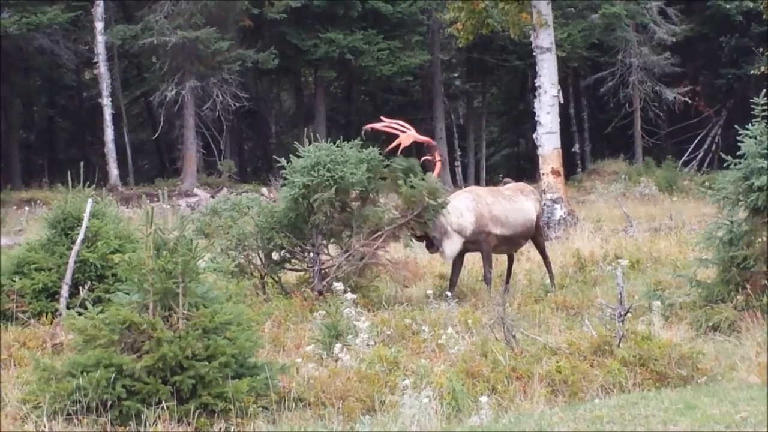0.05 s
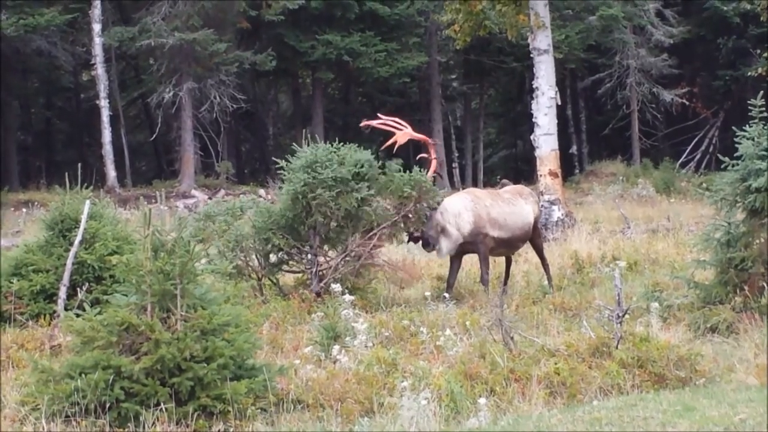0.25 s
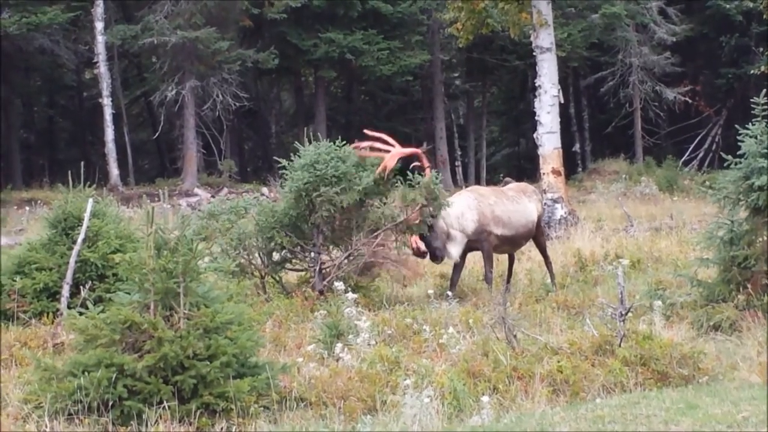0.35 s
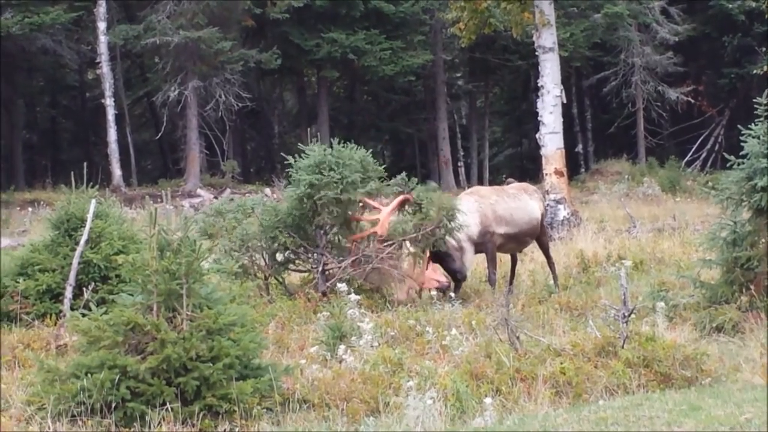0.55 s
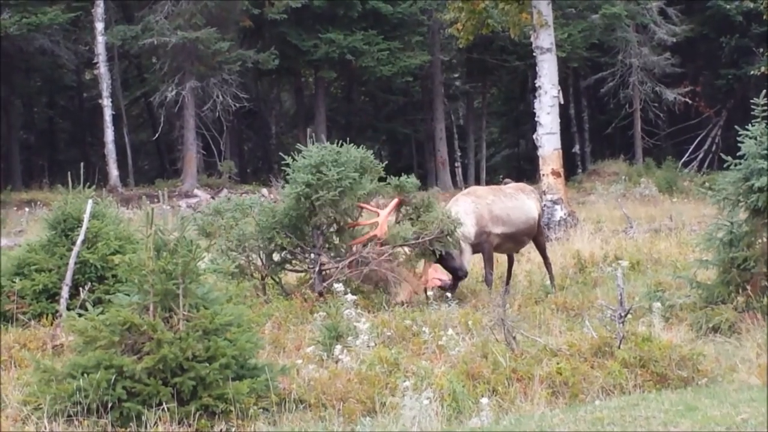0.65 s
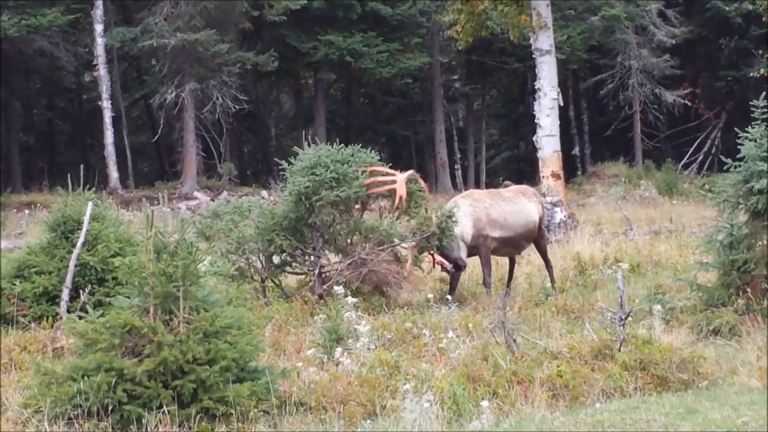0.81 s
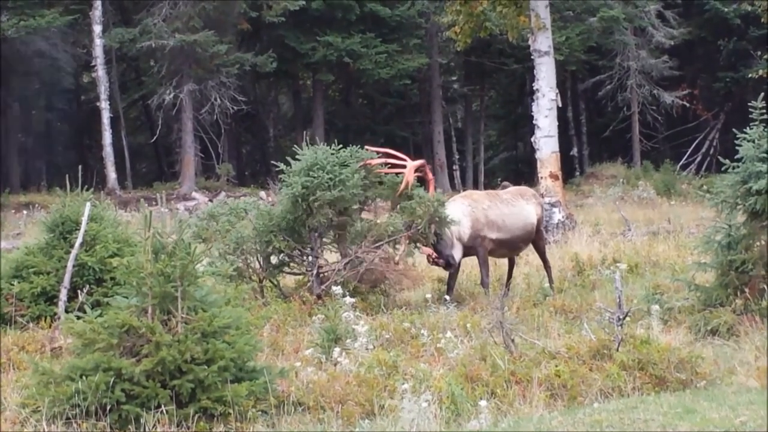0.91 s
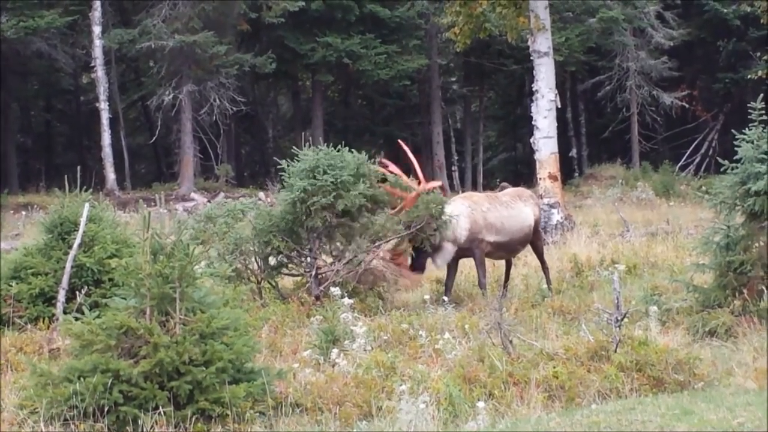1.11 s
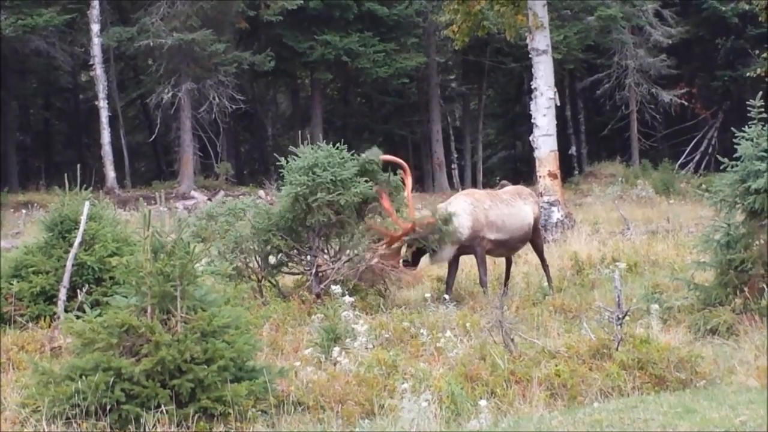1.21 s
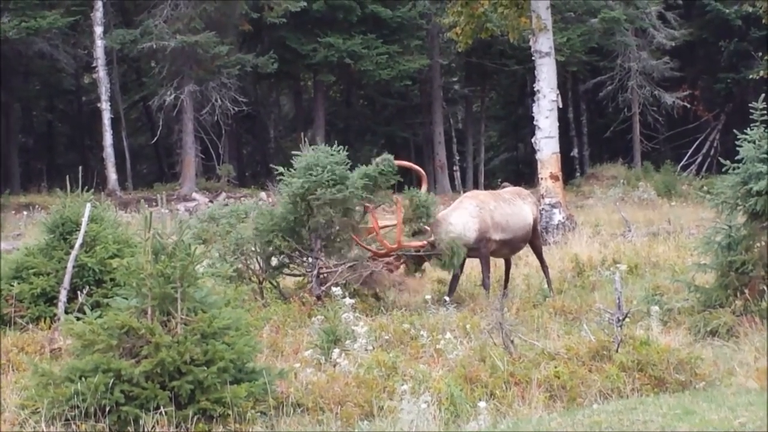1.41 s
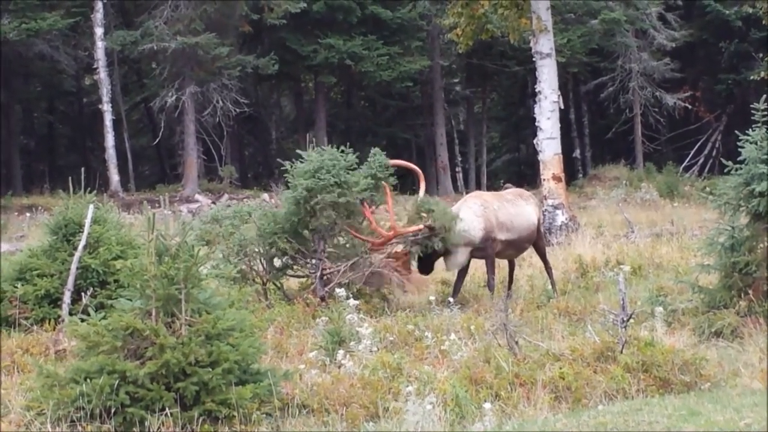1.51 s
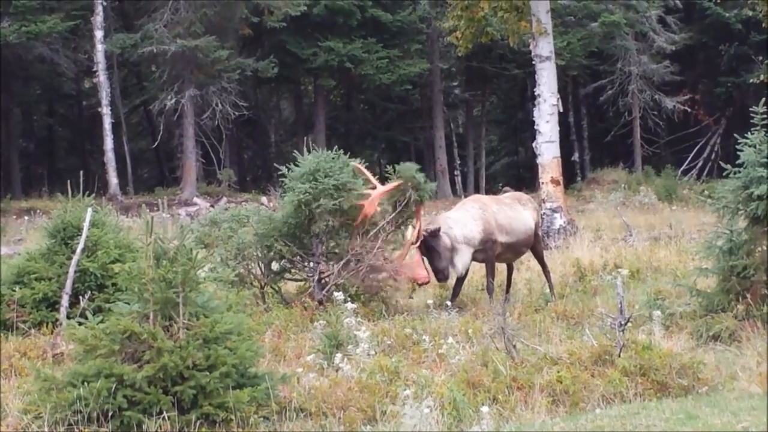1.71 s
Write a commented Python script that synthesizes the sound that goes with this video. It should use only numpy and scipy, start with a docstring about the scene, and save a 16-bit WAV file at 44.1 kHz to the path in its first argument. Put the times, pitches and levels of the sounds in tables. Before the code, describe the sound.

Branches swish, crackle and snap as a caribou rakes a tree, with brief bird chirps.

```python
"""Swishing, crackling and woody knocks: a caribou thrashes a small spruce at a forest edge, some way off.
Antler tines strike and scrape the boughs, needles and twigs rustle as dense tiny clicks, and dry twigs
snap. There is one dull thud, then a branch cracks fibre by fibre. A small bird nearby whistles and rasps.
The trees scatter the sounds back over a quiet outdoor floor."""
import sys
import numpy as np
from scipy import signal
from scipy.fft import rfft, irfft
from scipy.io import wavfile
from scipy.ndimage import uniform_filter1d

SR = 44100
rng = np.random.default_rng(int(sys.argv[2]) if len(sys.argv) > 2 else 0)


def file_out(sig):
    """Save sig as 16-bit WAV at sys.argv[1]."""
    # one column per channel
    cols = np.atleast_2d(sig).T
    # limit, then scale
    lim = np.clip(cols, -1, 1)
    pcm = np.round(lim * 32767).astype(np.int16)
    wavfile.write(sys.argv[1], SR, pcm)


N = 77175
LEAD_S = .01  # burst start to peak
SNAP_RISE = .29  # build-up time / decay time

# bough resonance: f/Hz, level/dB
WOOD = [(150, -17), (450, 1.5), (1050, 1), (1400, -3), (1760, 6), (2080, -4), (2450, 6.5), (3150, -6.5),
        (3550, -3), (4500, -5.5), (5800, 5.5), (7500, 6.5), (11000, -21.5)]


def knocks():
    """Tines strike and scrape boughs, each with the ring of wood and peaks of its own."""
    # t/s, level/dB, decay/s, centre f/Hz
    strikes = [(.035, -44.5, 0.0022, 2320), (.077, -43, 0.0046, 1920), (.111, -51, .005, 700),
               (.182, -47, 0.0097, 1720), (.257, -45.5, 0.0033, 1680), (.2615, -40.5, .002, 2040),
               (.281, -53, 0.0034, 1600), (.393, -48, .006, 1530), (.468, -50.5, 0.0027, 2300),
               (.487, -43, 0.0042, 2100), (.538, -51.5, 0.0023, 2400), (.604, -49.5, .003, 1770),
               (.655, -49.5, 0.0055, 960), (.659, -44.5, 0.0028, 2430), (.728, -52, 0.0016, 2530),
               (.861, -49.5, .0026, 2300), (.901, -50.5, 0.0022, 2050), (.917, -52, 0.0068, 2060),
               (1.109, -45.5, 0.0047, 2300), (1.122, -45.5, 0.0037, 1580), (1.178, -44, .0032, 1880),
               (1.192, -46.5, 0.0089, 1800), (1.203, -49, 0.0034, 2820), (1.217, -44.5, 0.0054, 1280),
               (1.223, -42, 0.00074, 1790), (1.244, -41.5, 0.0038, 1680), (1.297, -52.5, 0.0054, 1800),
               (1.311, -49, .005, 1490), (1.3482, -42, .0014, 1680), (1.3531, -36.3, .003, 1800),
               (1.362, -46, 0.0036, 1510), (1.393, -42, 0.0068, 1680), (1.405, -45, 0.0044, 1490),
               (1.445, -49, 0.012, 1320)]
    ripple_hz = np.arange(1, 64) * 263
    out = np.zeros(N)
    for s, db, decay_s, hz in strikes:
        bough_db = read(WOOD, ripple_hz) + 3 * rng.standard_normal(len(ripple_hz))
        bough = np.column_stack([ripple_hz, bough_db])
        add(out, s - LEAD_S, burst(db, decay_s, bough, hz, width_oct=.82, rise=.72))
    return outdoors(out * pan(1.8), near_db=-4, near_s=.0074, far_db=-16.5)


def rustle():
    """Needles swish, twigs crackle and boughs buffet as the tree is shaken."""
    # needle envelope: t/s, level/dB
    swish = [(0, -43), (.035, -58.5), (.085, -51.5), (.15, -52.5), (.19, -48.5), (.3, -50), (.41, -46),
             (.48, -51), (.53, -54), (.585, -49), (.66, -50.5), (.75, -57), (.83, -60.5), (.885, -52),
             (.91, -54.5), (.94, -48.5), (.99, -53), (1.05, -56), (1.07, -45), (1.12, -45.5), (1.16, -52),
             (1.23, -51), (1.28, -53.5), (1.33, -54.5), (1.4, -44.5), (1.45, -51.5), (1.5, -60),
             (1.58, -67), (1.75, -66.5)]
    # shaking envelopes: t/s, twig level/dB, bough level/dB
    shake = [(0, -53, -64), (.05, -59.5, -59), (.18, -51.5, -55.5), (.23, -51.5, -60.5), (.33, -57.5, -58),
             (.42, -52.5, -56.5), (.52, -58, -61), (.6, -54.5, -62), (.7, -58, -61.5), (.76, -60, -63),
             (.81, -62, -62.5), (.88, -59, -64.5), (.98, -60, -67.5), (1.05, -55.5, -62),
             (1.075, -55.5, -58.5), (1.15, -54.5, -57), (1.22, -49.5, -59.5), (1.28, -58, -57.5),
             (1.34, -55.5, -62.5), (1.4, -54, -57), (1.45, -57.5, -59), (1.49, -62, -65),
             (1.58, -67.5, -67.5), (1.75, -67.5, -72.5)]
    # spectra: f/Hz, level/dB
    needle_spectrum = [(1500, -29), (2500, -12), (3300, -13.5), (4500, -11), (5200, 3), (5850, 2),
                       (6600, 1), (8000, -1.5), (10500, -13), (12500, -22), (14500, -36)]
    twig_spectrum = [(200, -9.5), (330, -6), (550, -4.5), (1000, -5), (1750, -1.5), (2080, -3.5), (2500, 3),
                     (3200, -8), (4400, -8.5), (8000, -23)]
    bough_spectrum = [(20, 1.5), (42, -8), (70, 2), (125, 4), (210, 2), (330, -6.5), (600, -25.5),
                      (2000, -19)]
    needles = colour(spread(grains(per_s=9000, size_db=4), .28), needle_spectrum)
    twigs = colour(spread(grains(per_s=2200, size_db=2.5), .44), twig_spectrum)
    boughs = colour(spread(rng.standard_normal((3, N)), .73), bough_spectrum)
    foliage = needles * level(swish) * pan(-5) + twigs * level(shake) * pan(1)
    buffeting = boughs * level(shake, column=2) * pan(.8)
    return outdoors(foliage, near_db=-19.5, near_s=.0066, far_db=-16) + buffeting


def crack():
    """A branch gives way fibre by fibre and rings briefly."""
    # t/s, level/dB, centre f/Hz
    fractures = [(1.0572, -41, 2360), (1.0579, -34.5, 3260), (1.0592, -30, 1950), (1.0629, -39, 2400),
                 (1.0649, -37.5, 1890), (1.072, -46, 1710), (1.0765, -42, 1730), (1.091, -44.5, 1670)]
    # f/Hz, level/dB, t60/s
    branch_modes = [(1566, -47, 0.13), (1764, -41.5, .13), (1905, -44.5, .13), (1990, -41, .04),
                    (2285, -48, 0.1), (2450, -37, 0.082), (3574, -34, .03)]
    decay_s, ring_start_s = .00043, 1.059
    out, t = np.zeros(N), np.arange(SR // 4) / SR
    for s, db, hz in fractures:
        add(out, s - LEAD_S, burst(db, decay_s, WOOD, hz, width_oct=.56, rise=SNAP_RISE))
    add(out, ring_start_s, ring(branch_modes, t))
    return outdoors(out * pan(.66), near_db=-7, near_s=.0031, far_db=-12.5)


def ticks():
    """Thin dry twigs snap brightly."""
    # t/s, level/dB, centre f/Hz, left-right/dB
    snaps = [(0.0115, -42, 8500, -10), (0.0774, -38, 6800, -6), (.602, -34.5, 6100, -6),
             (0.61, -37, 5700, -2), (0.9293, -49.5, 8500, -12), (.9415, -48, 7800, -16),
             (1.0564, -39, 6700, -8), (1.0576, -36, 6300, -4), (1.0594, -38, 6300, -4),
             (1.085, -43, 6000, -3), (1.3485, -48.5, 7200, -14), (1.355, -51, 6200, -8),
             (1.5955, -58.5, 6900, -5), (1.7045, -53.5, 8000, -9)]
    # twig resonance: f/Hz, level/dB
    twig = [(500, -4), (2500, -5), (4300, -23), (5600, 1), (6800, 1.5), (8300, 0.5), (10500, -9),
            (14000, -2)]
    decay_s = .00086
    out = np.zeros((2, N))
    for s, db, hz, side_db in snaps:
        add(out, s - LEAD_S, pan(side_db) * burst(db, decay_s, twig, hz, width_oct=.35, rise=SNAP_RISE))
    return outdoors(out, near_db=-7, near_s=.0048, far_db=-14.5)


def flicks():
    """Dry needles flick past a tine in short sprays of fine clicks."""
    # peak t/s, half length/s, level/dB
    sprays = [(.085, .012, -61), (0.609, 0.0096, -46), (0.93, 0.028, -53.5), (1.08, 0.018, -57)]
    # spray spectrum: f/Hz, level/dB
    fizz = [(4000, -22), (7000, 3), (8500, -3), (11000, -5), (14000, -4)]
    t = np.arange(N) / SR
    swell = sum(amp(db) * np.exp(-((t - s) / half_s) ** 2) for s, half_s, db in sprays)
    return colour(spread(grains(per_s=6000, size_db=4), .35), fizz) * swell * pan(-8)


def thud():
    """One dull blow, as of a hoof or the trunk."""
    # f/Hz, level/dB, t60/s
    thud_modes = [(239, -41.5, 0.084), (292, -36, 0.027), (314, -44, 0.12), (401, -46.5, 0.087),
                  (664, -49, 0.043), (1190, -48.5, 0.032)]
    start_s, attack_s = .772, .0025
    out, t = np.zeros(N), np.arange(SR // 4) / SR
    add(out, start_s, np.minimum(t / attack_s, 1) * ring(thud_modes, t))
    return outdoors(out * pan(1.7), near_db=-11, near_s=.012, far_db=-14.5)


def bird_whistles():
    """Thin arched whistles that waver a little."""
    # t/s, length/s, first f/Hz, middle f/Hz, last f/Hz, level/dB, relative octave level/dB
    notes = [(0.204, 0.058, 4390, 5684, 5640, -25, -29.5), (0.271, 0.02, 5580, 5600, 5250, -37.5, -21),
             (.357, .034, 4700, 5880, 5270, -23, -46), (.436, 0.044, 4430, 5070, 4310, -49.5, -11),
             (1.507, 0.018, 6170, 6030, 5880, -59, -15), (1.639, 0.021, 6100, 5900, 5750, -63, -21)]
    rise_share, fall_share, waver_share, waver_db = .42, .26, .002, .6
    out = np.zeros(N)
    for s, length_s, first_hz, middle_hz, last_hz, db, octave_db in notes:
        u = np.linspace(0, 1, round(length_s * SR))
        hz = arch(u, first_hz, middle_hz, last_hz) * (1 + waver_share * quiver(len(u), smooth=100))
        phase = 2 * np.pi * np.cumsum(hz) / SR
        tone = unit(np.sin(phase) + amp(octave_db) * np.sin(2 * phase))
        ramp = np.minimum(u / rise_share, (1 - u) / fall_share)
        swell = np.sin(np.pi / 2 * np.minimum(ramp, 1)) ** 1.8
        add(out, s, amp(db + waver_db * quiver(len(u), smooth=100)) * swell * tone)
    return outdoors(out * pan(-8), near_db=-31, near_s=.0044, far_db=-19)


def bird_rasps():
    """Buzzy notes: gliding, jittery harmonics and a scratchy hiss pass one throat."""
    # one curve per note: t/s, f/Hz, level/dB, hoarseness/0-1
    notes = [
        [(.304, 1134, -52, .8), (.311, 1190, -36.5, 0.4), (.319, 1292, -35, 0.55), (.327, 1398, -36, 0.43),
         (.333, 1520, -38.5, 0.54), (.339, 1595, -31.5, 0.3), (.344, 1577, -36.5, 0.4), (.351, 1500, -50, 0.9)],
        [(.393, 1121, -49, .9), (.403, 1215, -34.5, 0.6), (.411, 1341, -38.5, 0.64), (.418, 1248, -41.5, 0.73),
         (.428, 1170, -48, 0.8)],
    ]
    # throat resonance: f/Hz, level/dB
    throat = [(1200, -37), (2200, -30), (2650, -10), (3200, -10), (3700, -23), (4250, -8.5), (4900, -16),
              (5700, -4), (6300, 4), (7200, -10), (8000, -9.5), (9400, -18.5), (10400, -23), (11300, -12),
              (12500, -21.5), (13500, -48)]
    jitter_share = .048
    out = np.zeros((2, N))
    hiss = colour(spread(grains(per_s=6000, size_db=3), .3), throat)
    for note in notes:
        s, *curves = np.transpose(note)
        t = np.arange(s[0], s[-1], 1 / SR)
        hz, db, hoarse = (np.interp(t, s, curve) for curve in curves)
        phase = 2 * np.pi * np.cumsum(hz * (1 + jitter_share * hoarse * quiver(len(t), smooth=24))) / SR
        harmonics = sum(amp(read(throat, k * hz)) * np.sin(k * phase + 2 * np.pi * rng.random())
                        for k in range(1, 11))
        breath = hiss[:, round(s[0] * SR):][:, :len(t)]
        add(out, s[0], amp(db) * (np.sqrt(1 - hoarse ** 2) * unit(harmonics) + hoarse * breath))
    return outdoors(out * pan(-4), near_db=-7, near_s=.00084, far_db=-13.5)


def outdoors(x, near_db, near_s, far_db):
    """Adds quick scatter from nearby foliage and a faint forest tail."""
    # forest decay: f/Hz, t60/s
    forest = [(100, 0.56), (1000, .4), (3000, 0.39), (6000, 0.61), (14000, 0.22)]
    t = np.arange(SR // 2) / SR
    near, far = rng.standard_normal((2, 2, len(t)))
    hz, frame_s, bands = signal.stft(far, SR, nperseg=256)
    decay = amp(-60 * frame_s / read(forest, hz)[:, None])
    far = signal.istft(bands * decay, SR, nperseg=256)[1][:, :len(t)]
    scatter = amp(near_db) * unit(near * np.exp(-t / near_s))
    tail = amp(far_db) * unit(far * np.minimum(t / .025, 1))
    x = x * np.ones((2, 1))
    return x + signal.fftconvolve(x, (scatter + tail) / np.sqrt(len(t)), axes=1)[:, :N]


def air():
    """Quiet outdoor floor, mostly low rumble."""
    # f/Hz, level/dB
    air_spectrum = [(15, -28), (42, 17), (70, 12), (135, -14), (260, -27), (1000, -12), (1500, -41),
                    (2500, -32), (3700, -12), (5900, -36), (9500, -12), (14000, -12)]
    return amp(-70) * colour(spread(rng.standard_normal((3, N)), .21), air_spectrum) * pan(-1.7)


def burst(db, decay_s, body, centre_hz, width_oct, rise, size=6144):
    """Slips swell until LEAD_S and die, ringing a body; db is the level of their energy over 5 ms."""
    hz, t = abs(np.fft.fftfreq(size, 1 / SR)), np.arange(size) / SR - LEAD_S
    skirt_db = -25.5
    hump = np.exp(-.5 * (np.log2((hz + 1) / centre_hz) / width_oct) ** 2) + amp(skirt_db)
    log_gain = np.log(hump * amp(read(body, hz)))
    response = np.fft.ifft(np.exp(np.conj(signal.hilbert(log_gain)))).real  # minimum phase
    envelope = np.exp(-np.maximum(t, -t / rise) / decay_s)
    slips = rng.standard_normal(size) * rng.exponential(1, size) * envelope
    sound = signal.fftconvolve(slips, response)[:size]
    return amp(db) * unit(sound) * np.sqrt(.005 * SR / size)


def ring(modes, t):
    """Sum of damped sines."""
    return sum(amp(db - 60 * t / t60) * np.sin(2 * np.pi * hz * t) for hz, db, t60 in modes)


def grains(per_s, size_db):
    """Three trains of tiny clicks, mostly small, a few large."""
    size = amp(size_db * np.minimum(rng.exponential(1, (3, N)), 4))
    return size * rng.choice([-1, 1], (3, N)) * (rng.random((3, N)) < per_s / SR)


def arch(u, first_hz, middle_hz, last_hz, place=.515, power=2.85):
    """Pitch curve over u = 0-1, flat around its middle."""
    away = np.where(u < place, (place - u) / place, (u - place) / (1 - place))
    return middle_hz + (np.where(u < place, first_hz, last_hz) - middle_hz) * away ** power


def quiver(count, smooth):
    """Fast unsteadiness: noise averaged over `smooth` samples."""
    return unit(uniform_filter1d(rng.standard_normal(SR // 8), size=smooth))[:count]


def colour(x, points):
    """Gives a steady sound a spectrum, at rms 1."""
    return unit(irfft(rfft(x) * amp(read(points, np.fft.rfftfreq(N, 1 / SR))), N))


def spread(three, correlation):
    """Stereo pair from one shared and two separate signals."""
    return np.sqrt(correlation) * three[0] + np.sqrt(1 - correlation) * three[1:]


def pan(db):
    """Left and right gains for a level difference."""
    return unit(amp([[db / 2], [-db / 2]]))


def level(table, column=1):
    """Gain over time from a dB column."""
    columns = np.transpose(table)
    return amp(np.interp(np.arange(N) / SR, columns[0], columns[column]))


def read(points, hz):
    """Interpolates on a log-frequency axis."""
    f, value = np.transpose(points)
    return np.interp(np.log(hz + 1), np.log(f), value)


def add(mix, s, sound):
    """Mixes a sound in at time s."""
    part = mix[..., max(round(s * SR), 0):][..., :sound.shape[-1]]
    part += sound[..., :part.shape[-1]]


def amp(db):
    """Decibels to gain."""
    return 10 ** (np.asarray(db) / 20)


def unit(x):
    """Scales to rms 1."""
    return x / np.sqrt(np.mean(x ** 2) + 1e-20)


def scene():
    """Thrashed spruce, bird and outdoor floor."""
    spruce = knocks() + crack() + ticks() + thud() + rustle() + flicks()
    return spruce + bird_whistles() + bird_rasps() + air()


def record(dry):
    """Two microphones, differently coloured, the left a moment late; then a low-pass."""
    # f/Hz, left-right/dB
    balance = [(100, 0.5), (1200, 0.5), (1900, 0.5), (2600, -3), (4000, -5.5), (5800, 8.5), (7500, -2),
               (12000, -2)]
    # f/Hz, phase lag/rad
    left_lag = [(100, 0.084), (1500, 0.37), (3000, .6), (5700, 1.23), (8000, 1.52), (12000, 1.63)]
    cutoff_hz = 14800
    hz = np.fft.rfftfreq(2 * N, 1 / SR)
    lean = amp(read(balance, hz) / 2)
    microphones = np.array([lean * np.exp(-1j * read(left_lag, hz)), 1 / lean])
    heard = irfft(rfft(dry, 2 * N) * microphones)[:, :N]
    lowpass = signal.firwin(401, cutoff_hz, window=("kaiser", 9), fs=SR)
    return signal.oaconvolve(heard, lowpass[None], "same", axes=1)


dry = scene()
out = record(dry)
file_out(out)
```